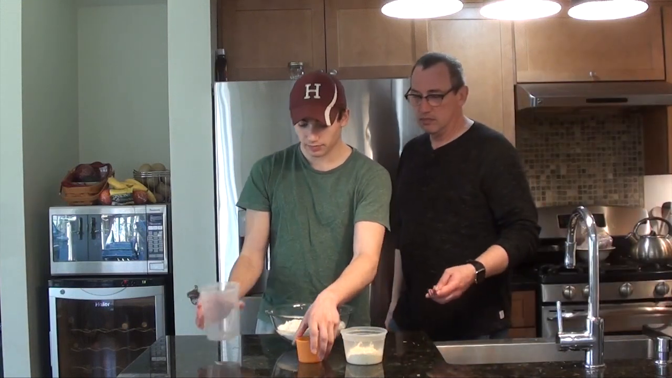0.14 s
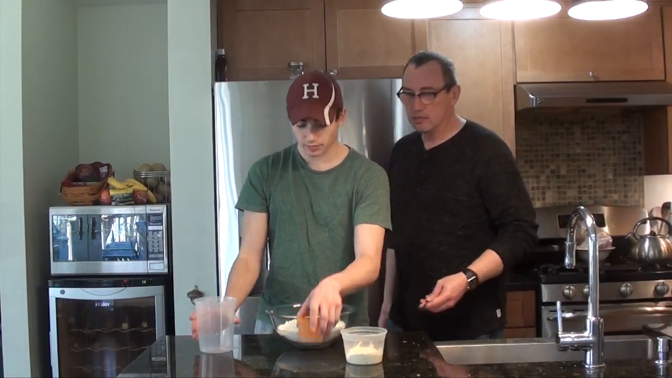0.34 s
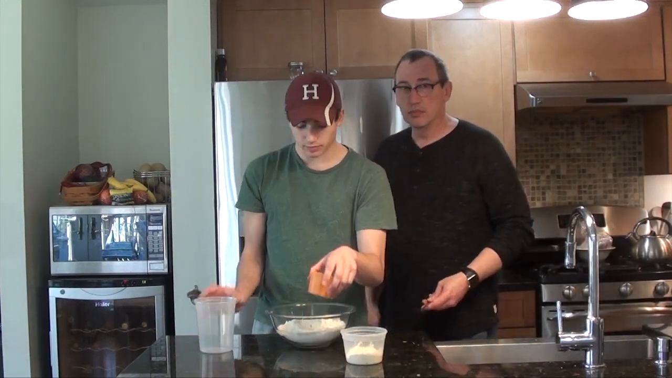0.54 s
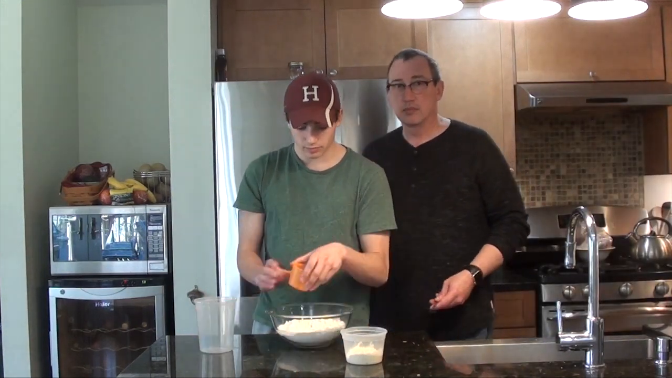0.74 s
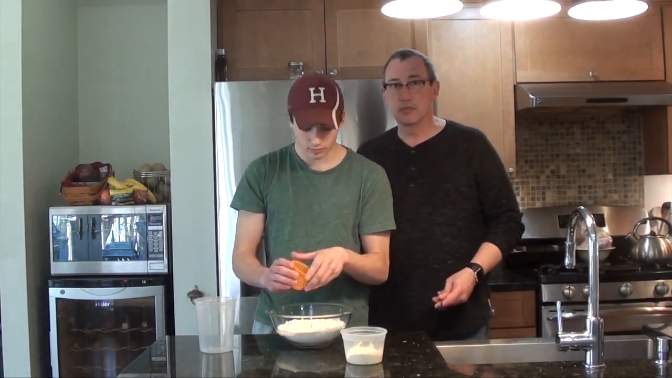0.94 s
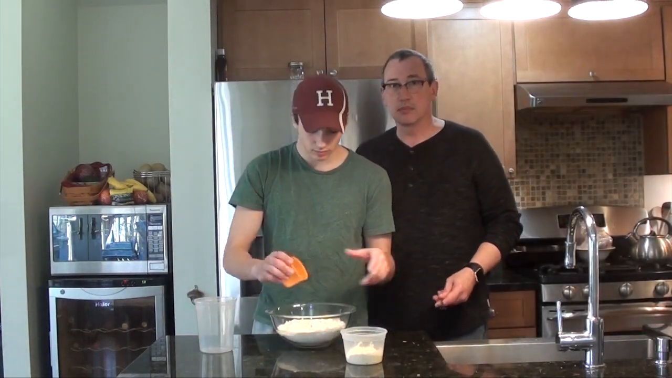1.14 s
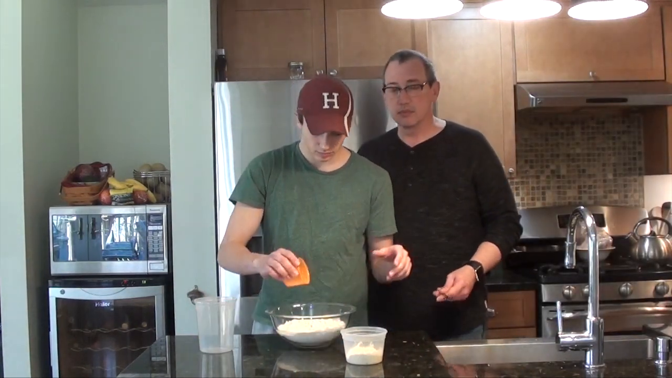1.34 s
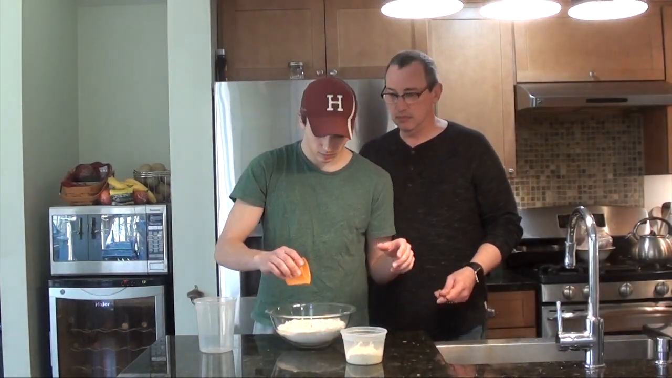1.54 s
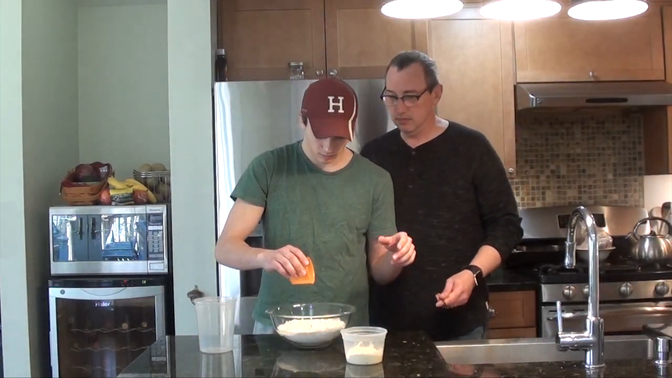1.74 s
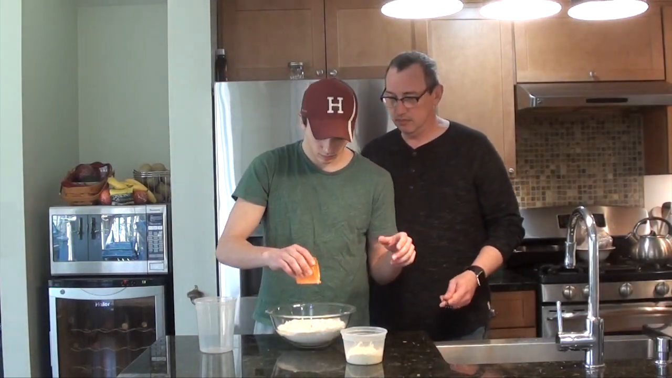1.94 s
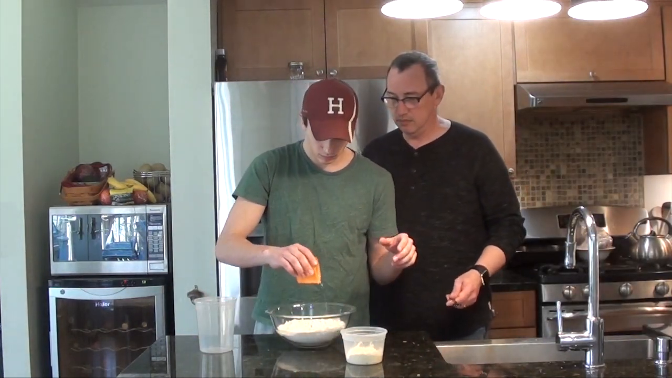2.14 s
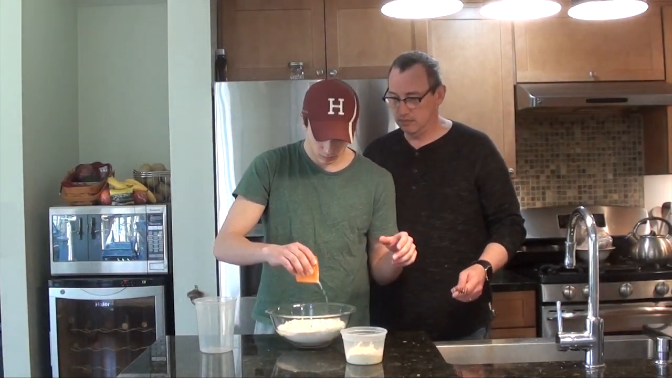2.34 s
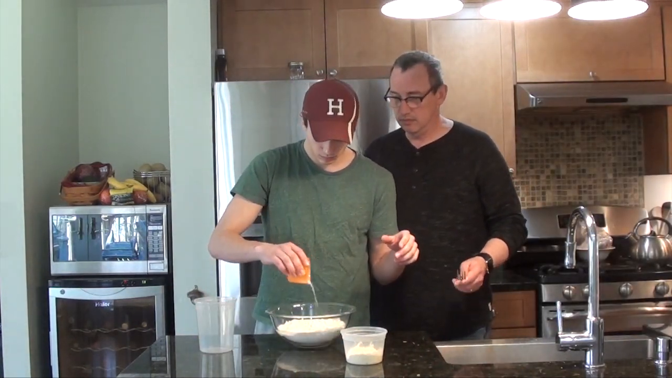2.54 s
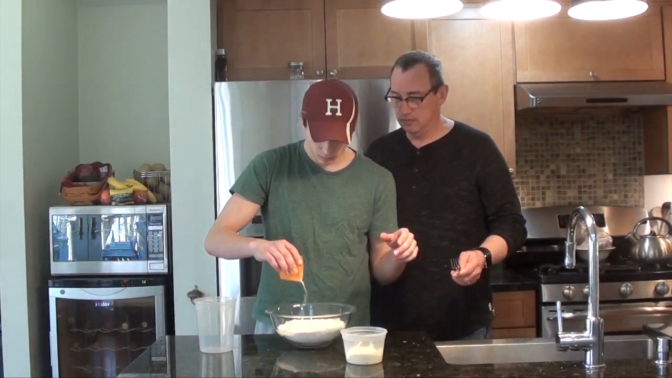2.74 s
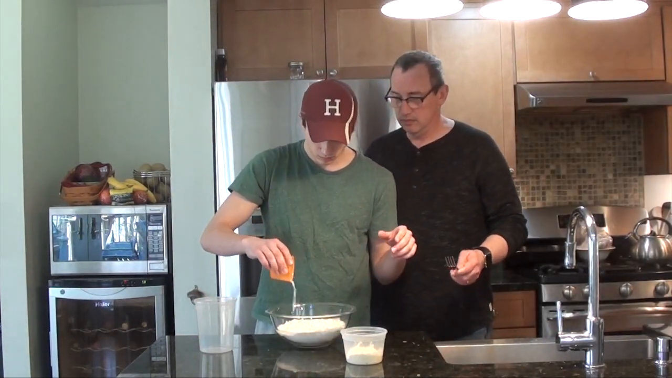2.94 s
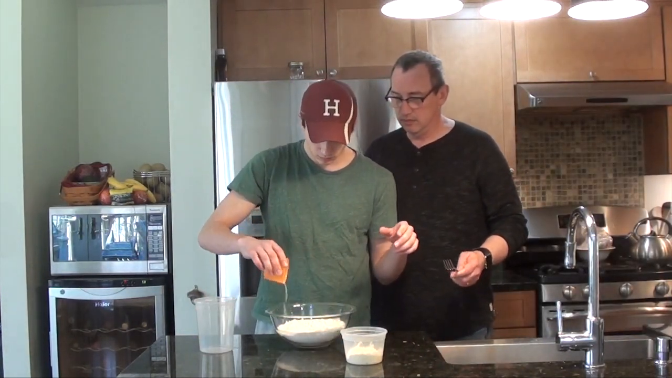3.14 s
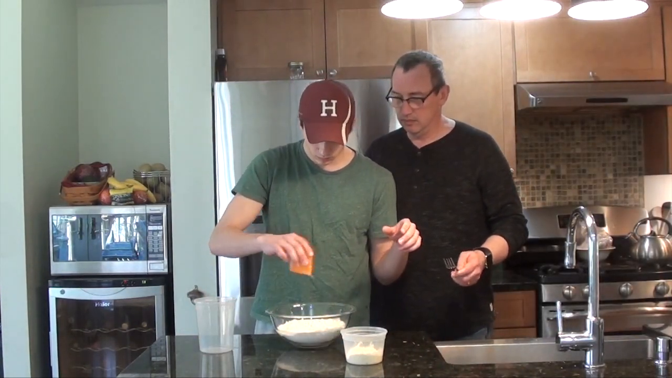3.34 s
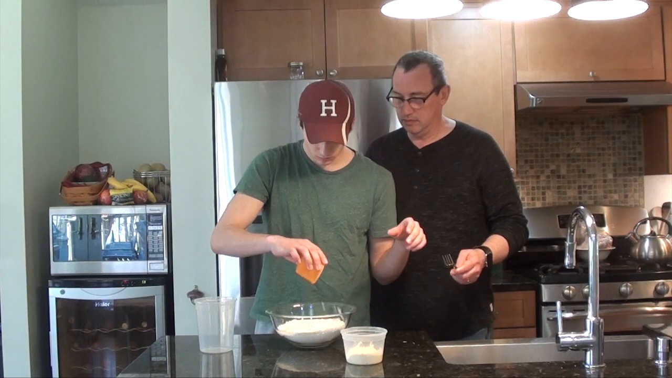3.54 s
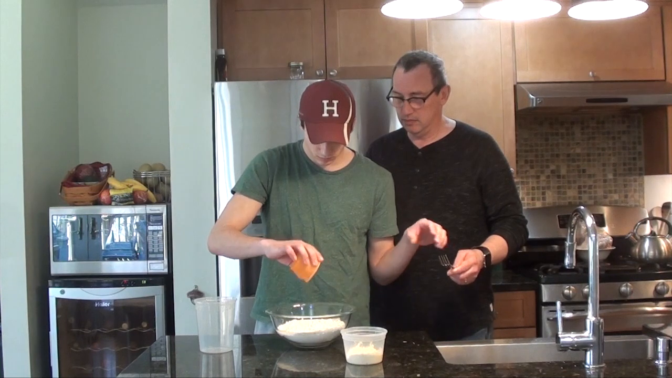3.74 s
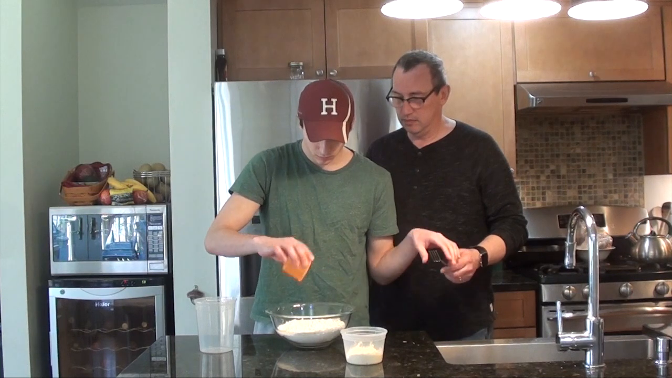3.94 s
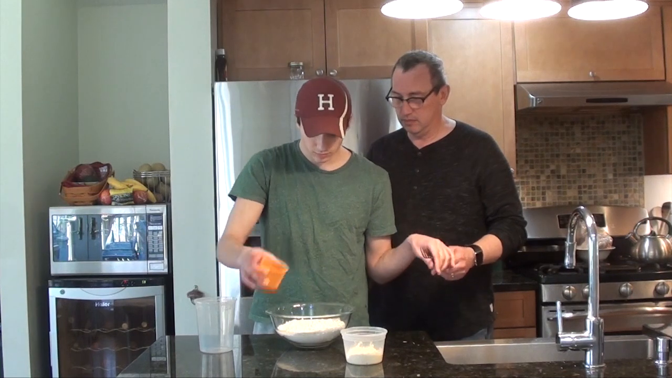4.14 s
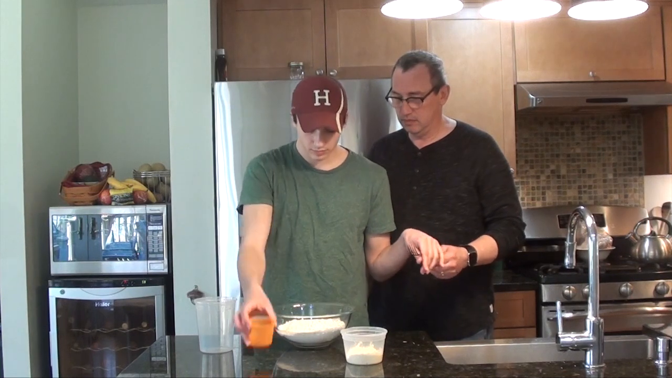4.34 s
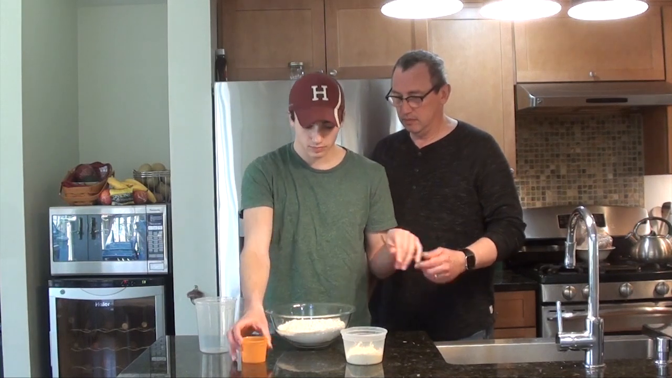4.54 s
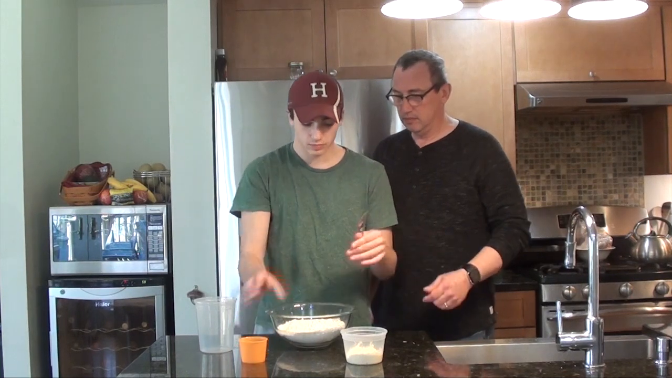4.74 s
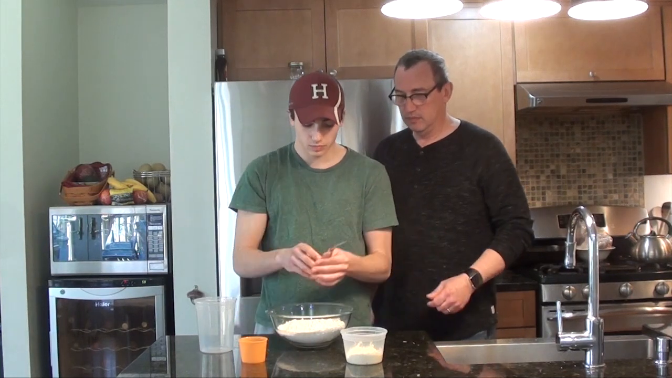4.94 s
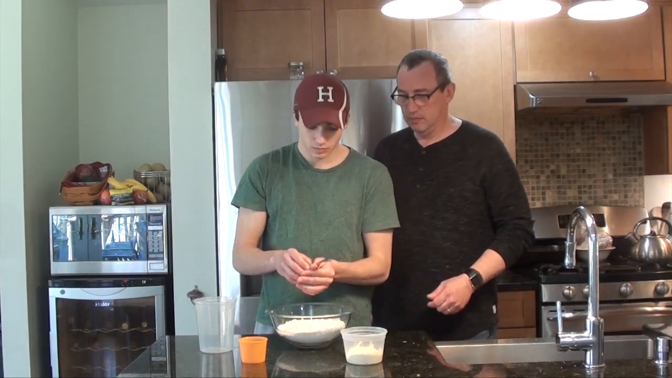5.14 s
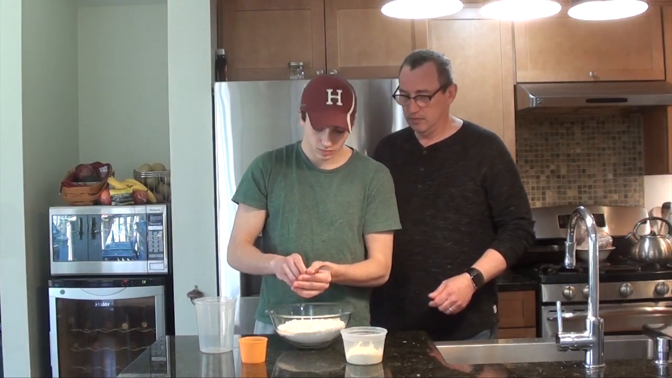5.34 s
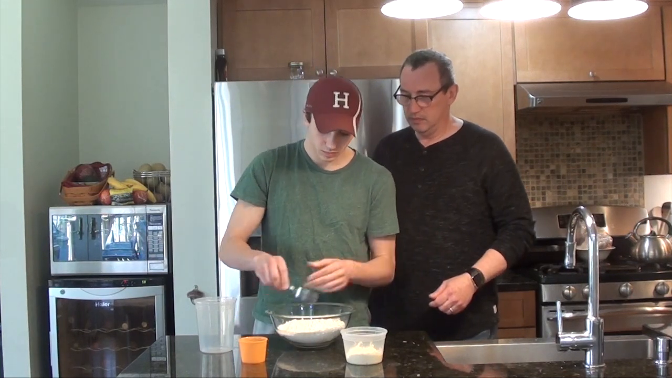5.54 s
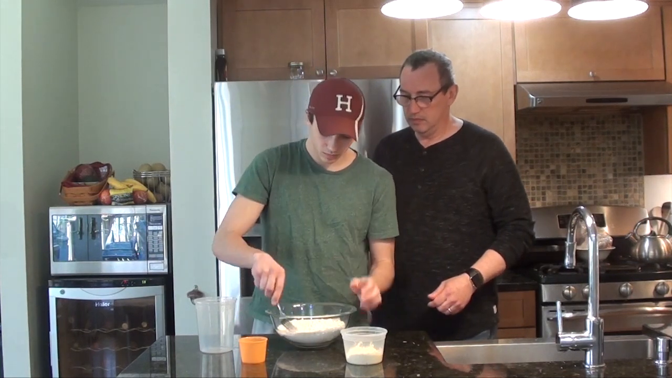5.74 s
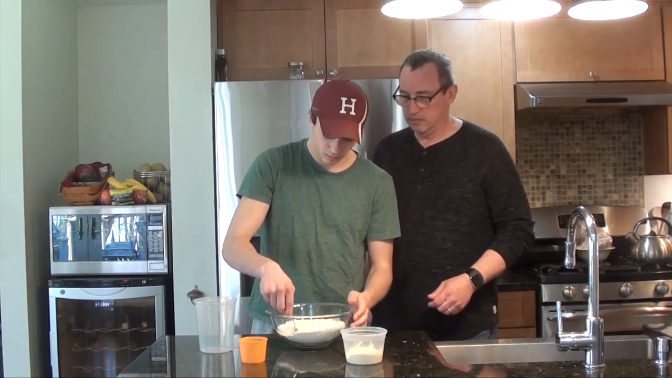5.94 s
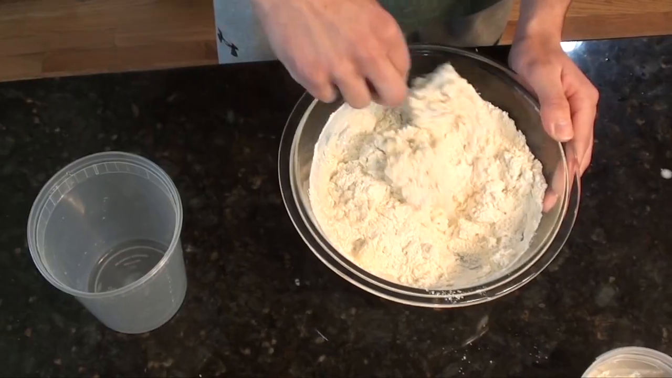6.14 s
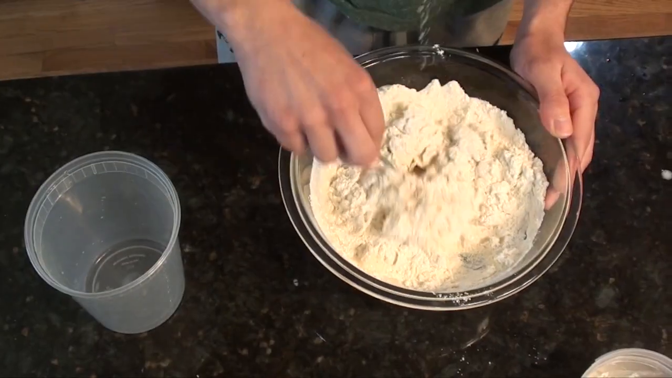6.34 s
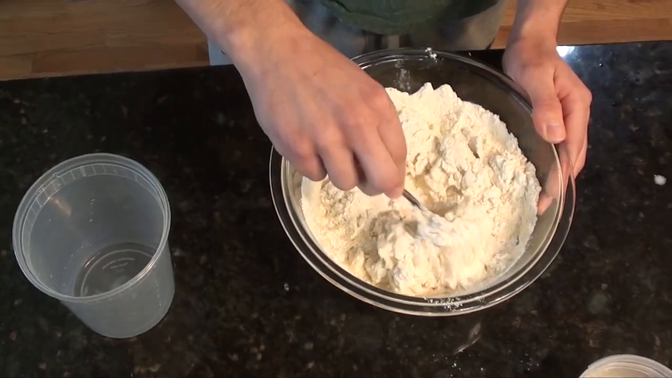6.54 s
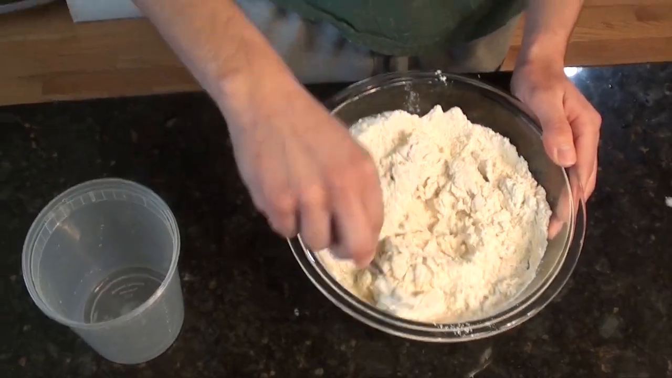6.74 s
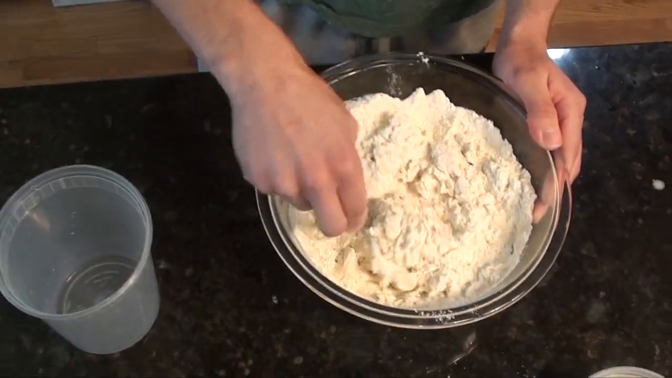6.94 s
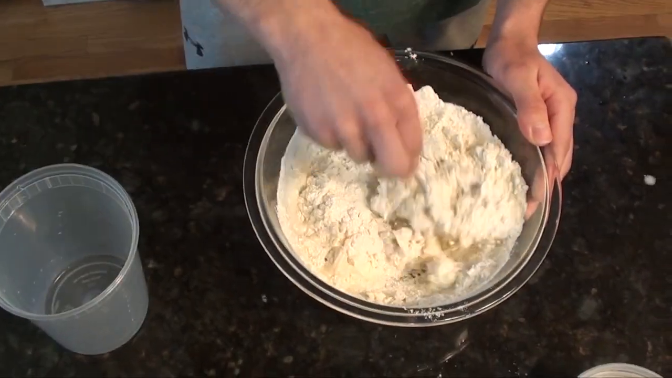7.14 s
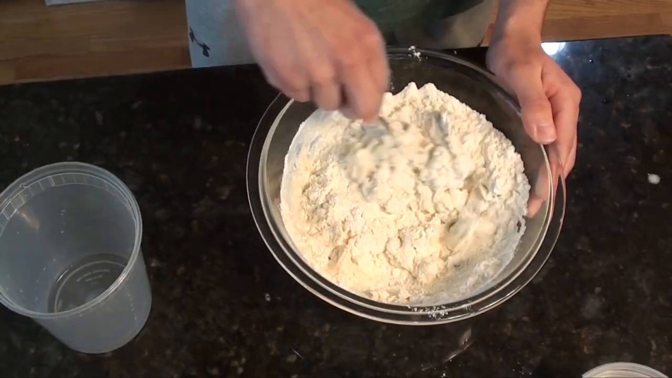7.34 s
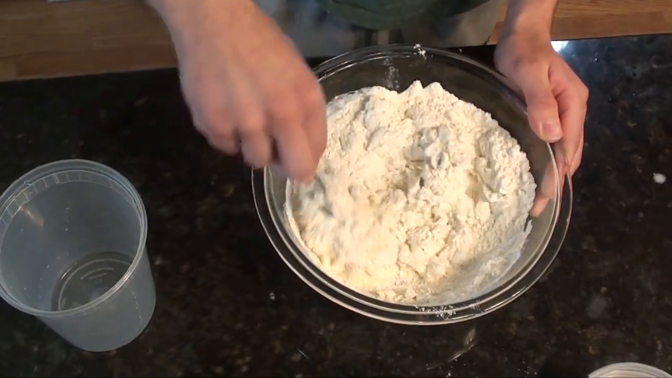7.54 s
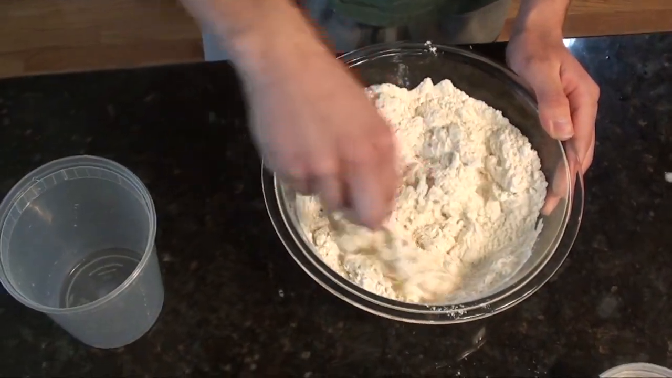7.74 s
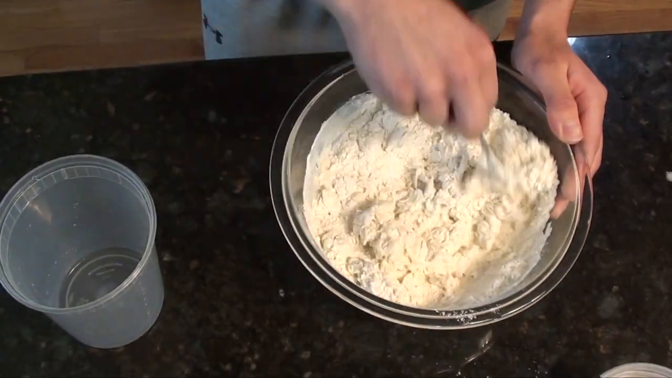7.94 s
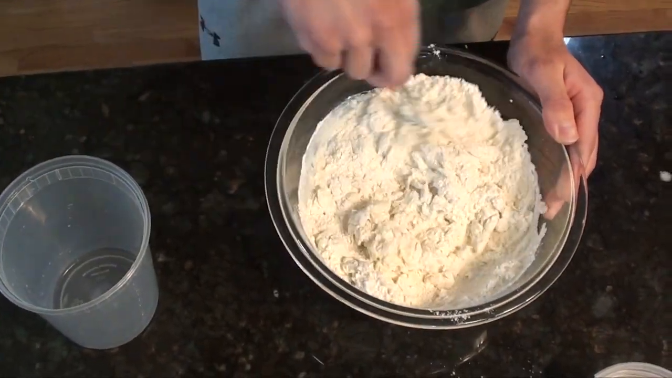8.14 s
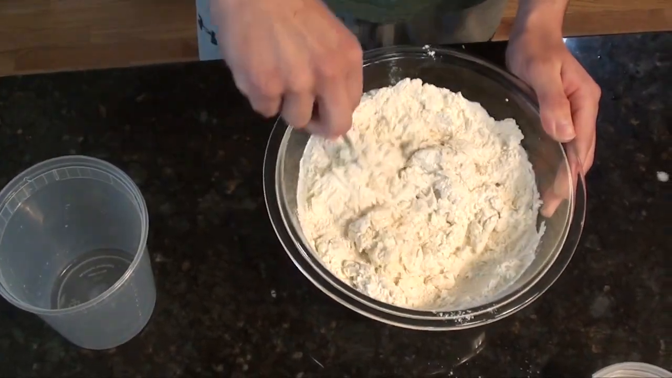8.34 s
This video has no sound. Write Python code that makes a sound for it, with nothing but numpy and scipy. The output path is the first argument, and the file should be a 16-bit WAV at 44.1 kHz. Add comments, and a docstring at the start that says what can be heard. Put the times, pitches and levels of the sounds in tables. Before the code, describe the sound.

Heard from across a hard, reflective kitchen: hollow plastic clack, faint rubbing of hands, a thin bright stream of dry grains pulsing quickly, a stiff cup tapping down, then a clear ringing clink of steel on glass. The microphone jumps to just above the bowl, cutting off the ring; a fork drags through flour, the loaded bowl knocks on stone in two short rattles, and dull little ticks follow. Low fridge hum and room air throughout.

```python
"""A hard kitchen with a stone counter: dough is started in a glass bowl. A plastic jug lands, dry grains are
shaken onto the flour, the cup is set down and a fork clinks the bowl: filtered impulses and decaying modes.
Stirring rocks the bowl on the stone twice. Grains, hands and fork strokes are shaped noise. The room rings
after the blows; a fridge hums as wavering sines under room air. At 6.08 s the sound is suddenly heard from
above the bowl instead of from across the counter."""
import sys
import numpy as np
from scipy import signal
from scipy.fft import rfft, irfft, next_fast_len
from scipy.io import wavfile
from scipy.ndimage import uniform_filter1d

SR = 44100
rng = np.random.default_rng(int(sys.argv[2]) if len(sys.argv) > 2 else 0)


def unload_wav(signal):
    """Save mono or channel-first audio to the path in sys.argv[1] as 16-bit WAV at rate SR, clipped to [-1, 1]."""
    wavfile.write(
        sys.argv[1],
        SR,
        np.round(np.clip(np.atleast_2d(signal).T, -1, 1) * 32767).astype(np.int16),
    )


N = 374409
T = np.arange(N) / SR
RING_T = np.arange(SR) / SR


def amp(db):
    """Decibels to gain."""
    return 10 ** (np.asarray(db) / 20)


def unit(x):
    """Scale to an rms of one."""
    return x / np.sqrt(np.mean(x ** 2))


def at(points, hz):
    """Read (Hz, value) points on a log-frequency axis."""
    points_hz, value = np.transpose(points)
    return np.interp(np.log(np.maximum(hz, 1)), np.log(points_hz), value)


def octaves(hz):
    """Octaves above 3 kHz, the pivot of every brightness tilt."""
    return np.log2(np.maximum(hz, 100) / 3000)


def colour(x, points):
    """Give a steady sound a spectrum, at an rms of one."""
    size = next_fast_len(N)
    gain = amp(at(points, np.fft.rfftfreq(size, 1 / SR)))
    return unit(irfft(rfft(x, size) * gain, size)[:N])


def walk(rate_hz):
    """Slow smooth random signal at an rms of one."""
    step = int(SR / rate_hz)
    held = np.repeat(rng.standard_normal(N // step + 1), step)
    smooth = uniform_filter1d(uniform_filter1d(held, step), step)
    return unit(smooth[:N])


def stereo(mid, side, side_db, top_hz, low_hz=170):
    """Two close microphone ports differ only in the middle of the range."""
    band = signal.butter(2, [low_hz, top_hz], "bandpass", fs=SR, output="sos")
    return mid + amp(side_db) * signal.sosfilt(band, side) * np.array([[1], [-1]])


def add(track, start_s, sound):
    """Lay a sound into a track."""
    i = int(start_s * SR)
    track[i:i + len(sound)] += sound[:N - i]


def knock(points, tilt_db, linger_s):
    """Response of a damped body that releases each frequency after its own delay; 0 dB is its rms over 5 ms."""
    size = 4096
    hz = np.fft.rfftfreq(size, 1 / SR)
    # minimum phase by folding the cepstrum
    cepstrum = irfft(np.log(amp(at(points, hz) + tilt_db * octaves(hz))))
    cepstrum[1:size // 2] *= 2
    cepstrum[size // 2 + 1:] = 0
    # random group delay, linger_s on average
    delay_s = linger_s * np.interp(hz, np.linspace(0, SR / 2, 90), rng.gamma(2, .5, 90))
    delay_phase = 2 * np.pi * np.cumsum(delay_s) * hz[1]
    response = irfft(np.exp(rfft(cepstrum) - 1j * delay_phase))[:size // 2]
    return response * np.sqrt(.005 * SR / np.sum(response ** 2))


def knocks(blows, body, linger_s):
    """Every blow excites the same damped body."""
    out = np.zeros(N)
    for start_s, level_db, tilt_db in blows:
        add(out, start_s, amp(level_db) * knock(body, tilt_db, linger_s))
    return out


def ring(hz, t60_s, level_db):
    """Exponentially decaying modes, each at a random starting phase."""
    phase = rng.uniform(0, 2 * np.pi, (len(hz), 1))
    decay = np.exp(-np.log(1000) * RING_T / t60_s[:, None])
    return amp(level_db) @ (decay * np.sin(2 * np.pi * hz[:, None] * RING_T + phase))


def rings(blows, modes):
    """Every blow wakes the same modes, tilted by its brightness."""
    out = np.zeros(N)
    hz, t60_s, mode_db = np.transpose(modes)
    for start_s, level_db, tilt_db in blows:
        add(out, start_s, ring(hz, t60_s, level_db + mode_db + tilt_db * octaves(hz)))
    return out


def diffuse(build_s=0.00062):
    """Dense wall echoes that build up quickly, each band decaying at its own rate."""
    # kitchen reverberation: pitch_hz, t60_s
    kitchen = [(100, 0.32), (500, 0.53), (1300, 0.59), (2700, 0.53), (5400, 0.5), (8000, 0.41),
               (15000, 0.14)]
    noise = rfft(rng.standard_normal(SR))
    edges_hz = np.geomspace(40, SR / 2, 19).astype(int)
    bins_hz, out = np.arange(len(noise)), 0  # one second of noise: bins 1 Hz apart
    for lo, hi in zip(edges_hz, edges_hz[1:]):
        band = irfft(noise * ((bins_hz >= lo) & (bins_hz < hi)), SR)
        out = out + band * np.exp(-np.log(1000) * RING_T / at(kitchen, np.sqrt(lo * hi)))
    return out * (1 - np.exp(-RING_T / build_s)) / np.sqrt(.04 * SR)


def room(x, wet_db, side_db=-14.0):
    """Direct sound plus the kitchen's echoes."""
    walls = stereo(diffuse(), diffuse(), side_db, top_hz=4260)
    return x + amp(wet_db) * signal.oaconvolve(x[None], walls, axes=1)[:, :N]


def swells(moves, rise):
    """Each movement climbs 20 dB to its crest and falls 20 dB over its length; rise is the climbing share."""
    power = 0
    for crest_s, level_db, length_s in moves:
        away = np.maximum((crest_s - T) / rise, (T - crest_s) / (1 - rise)) / length_s
        power = power + amp(level_db - 20 * away) ** 2
    return np.sqrt(power)


def friction(strength, points, rough_db, direct_db=-4.5):
    """Soft, uneven rubbing: coloured noise with a randomly wavering level."""
    noise = colour(rng.standard_normal(N), points)
    return room(noise * strength * amp(direct_db + rough_db * walk(60)), wet_db=8)


def nearness():
    """Listening place: 0 across the counter, 1 above the bowl."""
    move_s, length_s = 6.08, 0.009
    return np.clip((T - move_s) / length_s, 0, 1)


def clinks():
    """Steel meets glass: a click, then both ring together until the ring stops short at 6.08 s."""
    # clinks on the bowl: start_s, glass_db, fork_db, click_db, place (0 rim .. 1 wall)
    contacts = [(3.548, -21.5, -53, -52, 1), (3.603, -24.5, -45, -70, 0.87),
                (5.711, -0.5, -1.5, -18.5, 0.018)]
    # bending modes of the glass, some in close groups: pitch_hz, t60_s, rim_db, wall_db
    glass_modes = [(1418, .52, -30, -40), (2610, .48, -34, -44), (2638, .52, -31, -38),
                   (4040, .46, -31, -45), (4073, .42, -21, -35), (4120, .55, -26, -38),
                   (5684, .46, -26, -41), (5710, .52, -26, -39), (5743, .4, -19, -38),
                   (7526, .39, -28, -25), (8124, .37, -37, -33), (9442, .4, -31, -28),
                   (10440, .34, -35, -36), (11440, .33, -42, -26), (13612, .25, -36, -33)]
    # modes of the steel fork: pitch_hz, t60_s, level_db
    fork_modes = [(3758, .4, -38), (5286, .38, -38), (5879, .29, -31), (6804, .32, -27), (6839, .36, -26),
                  (6862, .31, -17), (6998, .33, -34), (7865, .31, -36), (8742, .37, -33), (9188, .25, -22),
                  (11620, .22, -36), (12620, .31, -42)]
    # click of steel on glass: pitch_hz, level_db
    click_body = [(250, -44), (560, -4.5), (850, -10), (1450, 4.5), (2100, -8.5), (2600, 3), (3100, -8),
                  (4100, -2), (4800, -9), (7200, -1), (9400, 3.5), (10500, -10), (13500, -10), (16000, -22)]
    click, tone = np.zeros(N), np.zeros(N)
    hz, t60_s, rim_db, wall_db = np.transpose(glass_modes)
    for start_s, glass_db, fork_db, click_db, place in contacts:
        add(click, start_s, amp(click_db) * knock(click_body, 0, linger_s=.003))
        # the place of contact weights the modes
        add(tone, start_s, ring(hz, t60_s, glass_db + rim_db + place * (wall_db - rim_db)))
        add(tone, start_s, amp(fork_db) * ring(*np.transpose(fork_modes)))
    heard = room(click, wet_db=6.5, side_db=-14) + room(tone, wet_db=-1.5, side_db=-4.5)
    return heard * np.sqrt(1 - nearness())


def rocking_bowl():
    """The foot of the bowl chatters on the stone; the flour damps its ring."""
    # bowl on stone: start_s, level_db, tilt_db_per_octave
    blows = [(6.7807, -15, -0.5), (6.790, -21, 0), (6.808, -18, 1), (6.818, -22, 0.5),
             (7.0454, -19.5, -0.5), (7.054, -22.5, -0.5), (7.079, -23.5, 0), (7.1082, -19.5, -.5),
             (7.125, -26.5, 0.5)]
    # thud of the loaded bowl and counter: pitch_hz, level_db
    body = [(40, -28), (125, -3.5), (215, -7.5), (420, 4), (660, -10.5), (820, 3), (1150, -11.5),
            (2350, -0.5), (3300, -8.5), (3750, -0.5), (4400, -14), (7200, -9.5), (8500, -20), (15000, -41)]
    # modes of the full, held bowl: pitch_hz, t60_s, level_db
    modes = [(315, 0.17, -16), (474, 0.15, -15), (542, 0.11, -13.5), (830, 0.29, -17), (1380, 0.37, -20),
             (1734, 0.13, -11.5), (2160, 0.25, -21), (2266, 0.18, -12.5), (2295, 0.22, -12),
             (2360, 0.29, -19), (2595, 0.095, -7), (2957, 0.13, -11.5), (3594, 0.14, -13.5),
             (3890, 0.17, -14.5), (4060, 0.26, -23), (4930, 0.041, -8.5), (6710, 0.3, -19),
             (6840, 0.18, -16)]
    thud = room(knocks(blows, body, linger_s=.004), wet_db=-2.5, side_db=-10.5)
    return thud + room(rings(blows, modes), wet_db=-9.0)


def ticks():
    """The fork finds the glass under the flour, which chokes the ring."""
    # fork on glass: start_s, level_db, tilt_db_per_octave
    blows = [(7.542, -49, 2.5), (7.586, -43.5, 4), (7.871, -35.5, -0.5), (8.143, -55, 5), (8.44, -54.5, 1)]
    # tick muffled by flour: pitch_hz, level_db
    body = [(300, -12), (800, 2), (1100, 5), (1400, -1.5), (1900, 1), (2400, -5), (2800, -3), (4200, -20),
            (5800, -5.5), (8000, -6), (12000, -18), (16000, -31)]
    # what still rings of glass and fork: pitch_hz, t60_s, level_db
    modes = [(1397, 0.14, -7.5), (5760, 0.18, -28), (7900, .13, -20)]
    return room(knocks(blows, body, linger_s=0.0017) + rings(blows, modes), wet_db=-2)


def flow():
    """Stream from the tipped cup: a first rush, then an even flow pulsed by the wrist until it runs out."""
    start_s, attack_s, stream_db = 1.228, 0.057, -50.5
    rush_db, rush_s = 12.5, 0.18
    runs_out_s, run_out_db_per_s = 2.835, 35
    crest_s, shakes_hz, shake_db = 2.166, 9.24, 2.5  # swing either way
    since_s = np.maximum(T - start_s, 0)
    rush = np.exp(-(since_s / rush_s) ** 2)
    shaking = (1 - rush) * np.cos(2 * np.pi * shakes_hz * (T - crest_s))
    emptying_db = run_out_db_per_s * np.maximum(T - runs_out_s, 0)
    level_db = stream_db + rush_db * rush + shake_db * shaking - emptying_db
    return np.minimum(since_s / attack_s, 1) * amp(level_db)


def pour(spread_db=2.5):
    """Countless tiny grains of uneven size hiss as they slide and land."""
    # grains slide in the cup as it is lifted and turned: crest_s, level_db, length_s
    slides = [(.22, -57.5, 0.97), (.797, -46, 0.48), (.945, -56, 0.13), (1.03, -54, .2),
              (1.19, -55.5, 0.31)]
    # a clump drops against the glass: start_s, level_db, tilt_db_per_octave
    clumps = [(1.9235, -40, 1)]
    # hiss of the grains: pitch_hz, level_db
    hiss = [(1000, -22), (2700, -22), (3300, -9.5), (4200, -12), (5600, -5), (8300, -0.5), (10500, -7),
            (13000, -16.5), (16000, -19)]
    size_db = spread_db * np.minimum(rng.exponential(size=N), 6)
    grains = rng.standard_normal(N) * amp(size_db)
    stream = colour(grains, hiss) * np.hypot(swells(slides, rise=.67), flow())
    return room(stream + knocks(clumps, hiss, linger_s=0.0043), wet_db=-13.0, side_db=-24)


def cup():
    """The small stiff cup lands on one edge, then flat."""
    # landings: start_s, level_db, tilt_db_per_octave
    blows = [(4.5118, -13.5, 1), (4.5156, -22.5, 3)]
    # stiff wall: pitch_hz, level_db
    body = [(300, -33), (600, -26), (850, -11.5), (1000, -9), (1290, 3.5), (1600, -6.5), (2000, -22),
            (2250, -20), (3100, -14.5), (4300, -29), (5500, -27.5), (7500, -37.5), (10000, -42.5),
            (15000, -79)]
    return room(knocks(blows, body, linger_s=0.000352), wet_db=5.0)


def jug():
    """The empty plastic jug lands and rattles with a hollow clack."""
    # landings: start_s, level_db, tilt_db_per_octave
    blows = [(.295, -25.5, 1.5), (.298, -26.5, 0.5), (.3035, -30, -3.5), (.3125, -24.5, -3),
             (.359, -36.5, 1.5), (.412, -39, -7)]
    # hollow clack: pitch_hz, level_db
    body = [(120, -35), (300, -14), (430, 0.5), (620, 1.5), (820, -5.5), (1100, -22), (1550, -10),
            (1950, -17.5), (2200, -4.5), (2850, -13.5), (3200, -20), (6000, -19.5), (9000, -26.5),
            (15000, -40)]
    return room(knocks(blows, body, linger_s=0.001154), wet_db=2.5)


def stirring():
    """Steel scrapes through flour in slow strokes."""
    # fork strokes: crest_s, level_db, length_s
    drags = [(6.35, -70, 1.4), (7.53, -57, 0.88)]
    # steel through flour: pitch_hz, level_db
    scrape = [(400, 1), (1400, -6), (1900, -4.5), (2500, -6), (3300, -1.5), (3800, -2), (4400, -2),
              (4950, -4.5), (5450, 0.5), (6100, -15), (14000, -12.5)]
    return friction(swells(drags, rise=0.34), scrape, rough_db=0.7)


def hands():
    """Skin rubs the plastic cup."""
    # rubs: crest_s, level_db, length_s
    rubs = [(.73, -51, 0.54), (1.1, -61, 3.7)]
    # skin on plastic: pitch_hz, level_db
    skin = [(500, -14), (1250, -9), (1650, -2), (1950, -10), (2250, -8), (2800, -14.5), (3500, -8.5),
            (5400, -9), (14000, -19.5)]
    return friction(swells(rubs, rise=0.53), skin, rough_db=2.0)


def air(points, level_db, flicker_db=-0.5, side_db=-4.0):
    """Room air: steady coloured noise with a slight flicker in level."""
    mid, side = (colour(rng.standard_normal(N), points) for _ in range(2))
    return stereo(mid, side, side_db, top_hz=3640, low_hz=407) * amp(level_db + flicker_db * walk(9))


def background(waver_db=0.8, drift=0.002):
    """Air and a fridge hum of sines wavering in pitch and level, as heard from either place."""
    # room air across the counter: pitch_hz, level_db
    air_far = [(25, -35), (50, -11), (110, -1.5), (140, -5), (200, 0), (400, -2.5), (700, -7.5), (950, -5),
               (1400, -12.5), (2800, -16.5), (8500, -18.5), (15500, -20.5)]
    # room air above the bowl: pitch_hz, level_db
    air_near = [(25, -36), (50, -20), (95, 0.5), (140, -3.5), (220, -3.5), (370, 4), (700, -4), (980, -3),
                (1400, -11.5), (2800, -16.5), (8500, -16.5), (15500, -19.5)]
    # fridge hum: pitch_hz, far_db (across the counter), near_db (above the bowl)
    hum = [(58.8, -68, -90), (178.1, -59.5, -63), (258.2, -65, -84), (312.5, -67, -68.5),
           (350.4, -71.5, -62.5), (367, -75.5, -61.5), (568, -70, -66)]
    near = nearness()
    out = np.sqrt(1 - near) * air(air_far, level_db=-54.5) + np.sqrt(near) * air(air_near, level_db=-53.5)
    for hz, far_db, near_db in hum:
        phase = 2 * np.pi * np.cumsum(hz * (1 + drift * walk(8))) / SR
        level_db = far_db + near * (near_db - far_db) + waver_db * walk(6)
        out = out + unit(np.sin(phase)) * amp(level_db)
    return out


def scene():
    """Everything on and around the counter."""
    bowl = clinks() + rocking_bowl() + ticks() + stirring()
    vessels = pour() + cup() + jug() + hands()
    return bowl + vessels + background()


def record(dry):
    """The recorder cuts the top with a steep low-pass."""
    top_hz = 15900
    return signal.sosfilt(signal.ellip(8, .2, 70, top_hz, fs=SR, output="sos"), dry)


dry = scene()
out = record(dry)
unload_wav(out)
```